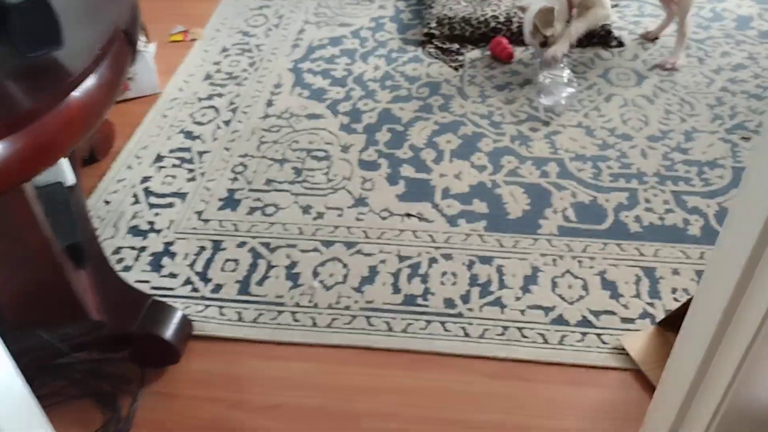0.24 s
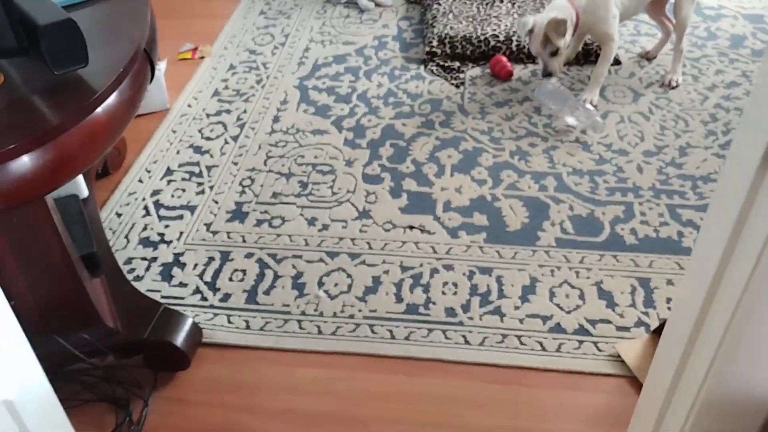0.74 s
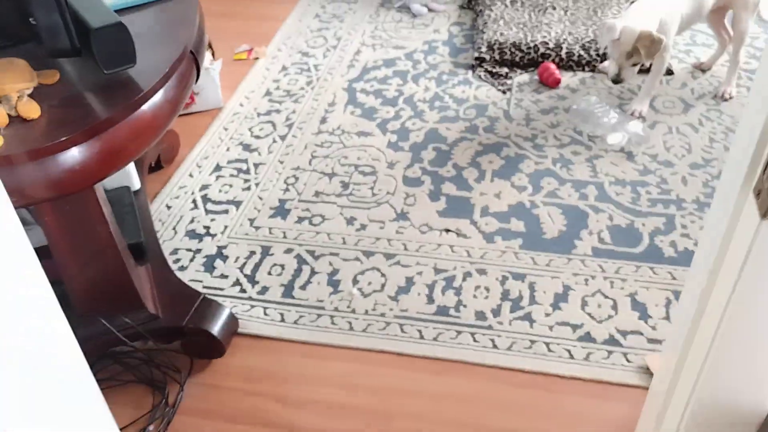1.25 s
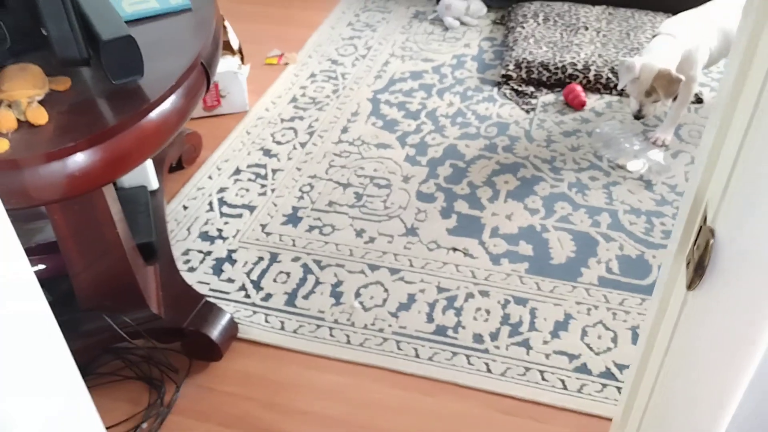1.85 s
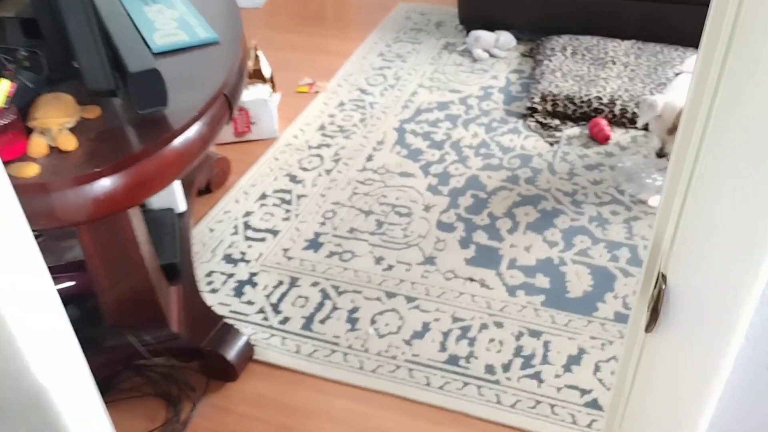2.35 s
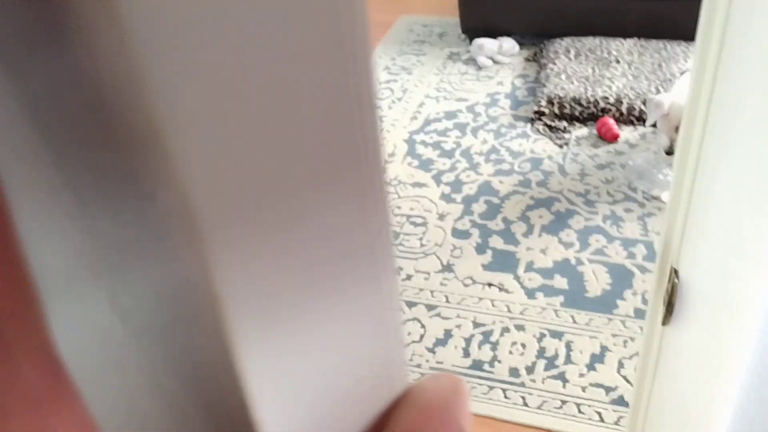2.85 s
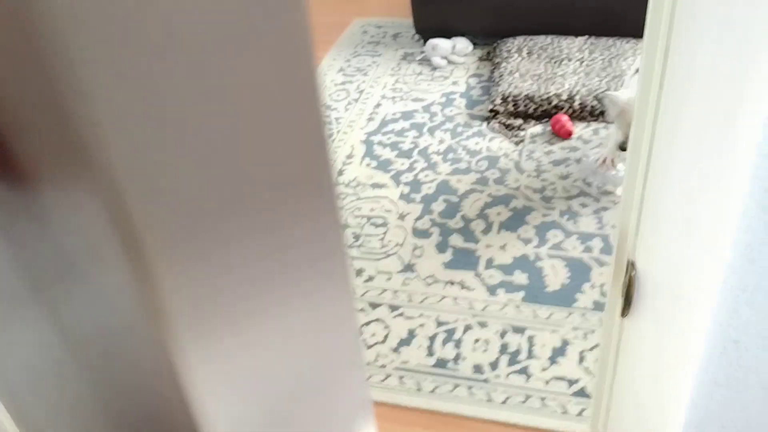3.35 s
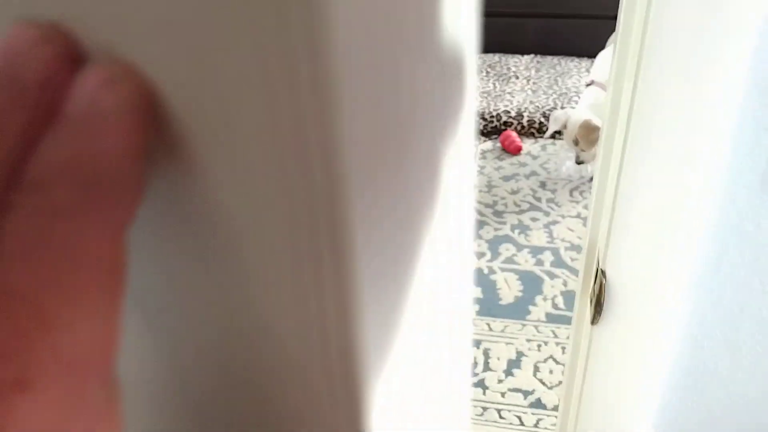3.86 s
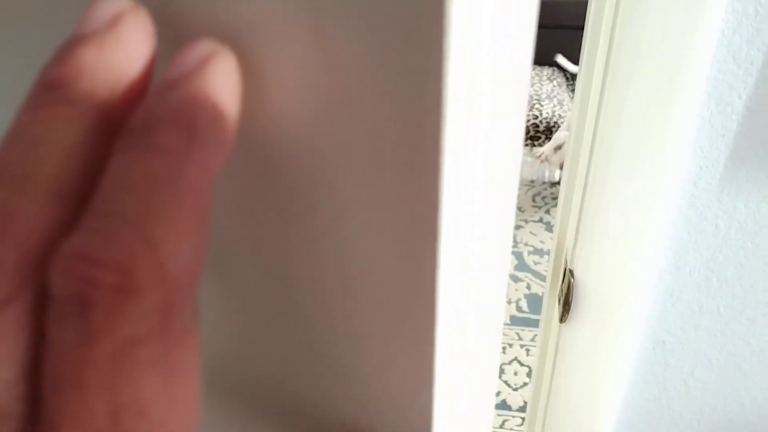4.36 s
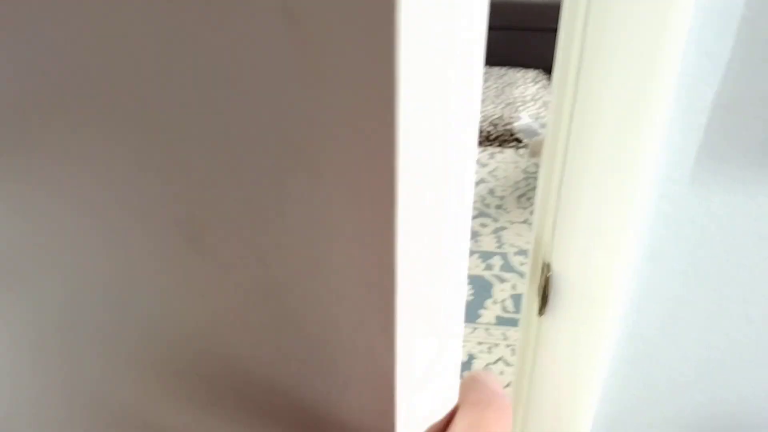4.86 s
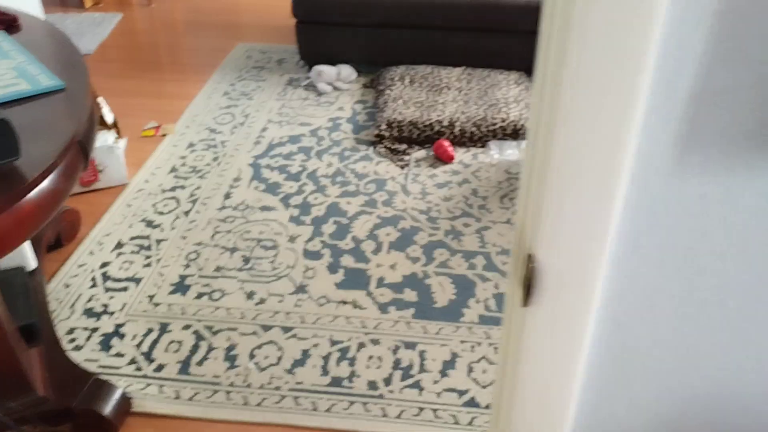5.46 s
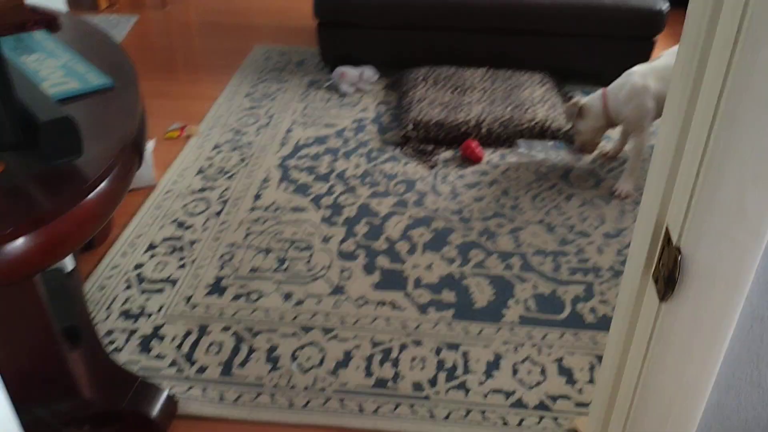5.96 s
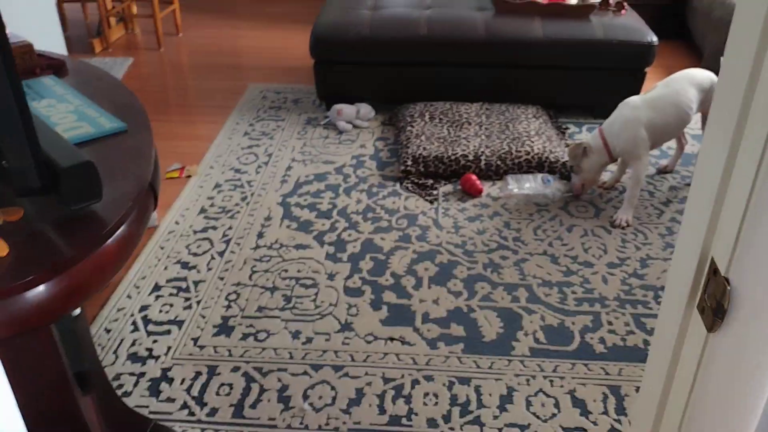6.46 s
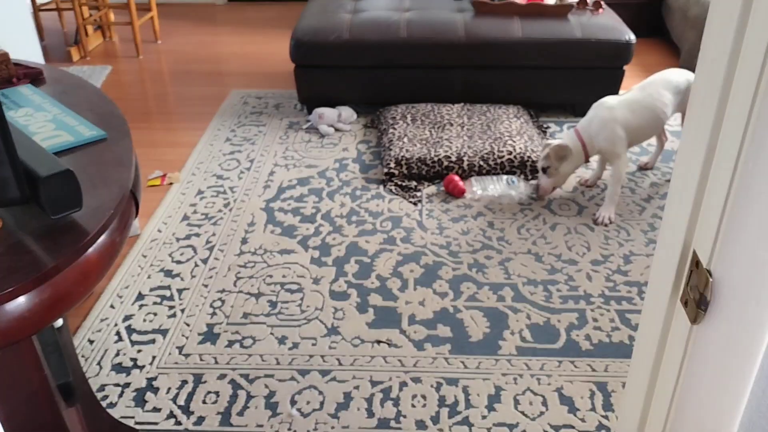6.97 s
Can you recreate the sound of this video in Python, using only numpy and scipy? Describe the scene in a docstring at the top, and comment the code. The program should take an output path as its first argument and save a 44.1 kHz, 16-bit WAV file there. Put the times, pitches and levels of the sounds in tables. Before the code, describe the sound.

A quiet living room, picked up in stereo from the doorway, with very faint room tone. A puppy mouths an empty plastic bottle on a rug. From 0.3 s sharp dry snaps begin; between 0.43 and 0.9 s they become the loudest cluster, bright cracks with hollow low-mid pops, rattle and a floor thump near 0.9. Crinkling continues, with smaller cracks at 1.2 and 1.4 s. From 1.5 to 3.2 s it is mostly quiet: soft sliding hiss around 2 s, thin airy squeaks, faint dull taps on the door and a barely audible low hum. A bright double snap comes at 3.25 s, then light crumpling from 3.5 to 4 s. Bouts of crackle and hollow knocks follow at 4.6-4.95 and 5.15-5.6 s. After a lull with a dull close tap at 5.9, crunching returns at 6.2-6.9 s, ending with a faint rustle near 7.1. Short diffuse reverberation follows each crack.

```python
"""A living room with a rug, heard from the doorway: a puppy bites and shoves an empty plastic bottle.
Each bite is a noise burst that snaps and a set of ringing modes that boom and rattle.
Small random ticks crinkle the wall between bites; shaped noise hisses as the bottle slides on the pile.
A diffuse tail rings on after every blow. Thumps, door hum, taps, whistles and room tone lie around it.
Two microphone ports with their own colour pick it up."""
import sys
import numpy as np
from scipy import signal
from scipy.fft import rfft, irfft
from scipy.io import wavfile
from scipy.ndimage import uniform_filter1d

SR = 44100
rng = np.random.default_rng(int(sys.argv[2]) if len(sys.argv) > 2 else 0)


def store_wav(level_fs):
    """Save 16-bit WAV to argv[1]."""
    pcm = np.round(np.clip(np.atleast_2d(level_fs), -1, 1) * 32767)
    wavfile.write(sys.argv[1], SR, pcm.T.astype(np.int16))


N = 318843

# Spectrum of the quiet room: f/Hz, relative level/dB
ROOM_TONE_COLOUR = [(15, -58.5), (25, -16.5), (91, -1), (168, -15.5), (271, -18.5), (2780, -33),
                    (6160, -32.5), (7820, -26), (10200, -35.5), (11000, -20), (14000, -37.5)]
# A thin steady whine: f/Hz, width/Hz, level/dB
WHINE_BANDS = [(11060, 32, -69.5)]
# Low thumps through the floor: t/s, level/dB
FLOOR_THUMPS = [(.26, -66), (.41, -51), (.675, -35), (.79, -55), (0.882, -21), (1.0, -35), (1.15, -52),
                (1.42, -69.5), (2.17, -69), (3.26, -47.5), (3.44, -42), (3.6, -44.5), (4.03, -56),
                (4.19, -60.5), (4.68, -53.5), (4.76, -44.5), (5.18, -60), (5.32, -46.5), (5.43, -53),
                (6.43, -61)]
# Low hum of the moving door: start t/s, end t/s, level at start/dB, level at end/dB
DOOR_MOVE = (2.5, 3.5, -70.5, -67)
# Fingers on the door: t/s, level/dB, f/Hz
DOOR_TAPS = [(1.88, -54, 460), (2.186, -56.5, 150), (2.655, -58.5, 201), (3.033, -49.5, 469.4),
             (3.064, -53.5, 109.7), (5.93, -44.5, 317)]
# Decay of the room by 60 dB: f/Hz, t60/s
ROOM_DECAY = [(100, 0.067), (300, 0.49), (1000, 0.35), (4000, 0.43), (12000, 0.16)]
# Likeness of left and right noise, 1 the same, 0 unrelated, -1 opposed: f/Hz, likeness
STEREO_LIKENESS = [(60, -0.7), (180, 0.85), (550, 0.72), (1650, -0.12), (4970, -0.27), (15000, -0.34)]
# Colour difference of the two ports: f/Hz, left over right/dB
PORT_COLOUR = [(60, 2), (160, -1), (270, 2.5), (450, 3.5), (740, 5), (1220, 7), (2010, 8.5), (3330, 13.5),
               (5500, 9), (7000, 15.5), (8800, 19.5), (9800, 2), (11200, -5.5), (14000, 2.5)]
# Narrow whistles inside the hiss; a row that ends before it starts is silent:
# start t/s, end t/s, f/Hz, width/Hz, level/dB
WHISTLE_BANDS = [(1.5, 2.34, 4700, 82, -61), (1.93, 2.336, 5700, 270, -53), (1.6, 2.39, 2490, 100, -65.5),
                 (2.52, 2.72, 7700, 310, -67), (3.03, 3.4, 3200, 260, -56), (3.3, 3.24, 1950, 130, -77),
                 (4, 3.24, 650, 68, -63.5), (1.73, 2.5, 614, 57, -77.5), (4.2, 3, 800, 100, -54),
                 (1.93, 2.3, 3870, 180, -59)]
# Spectrum of crackle and rubbing: f/Hz, relative level per Hz/dB
HISS_COLOUR = [(880, -14), (1500, -6), (2480, -7.5), (3050, -6.5), (4480, -12), (5550, -5.5), (6450, -11.5),
               (8370, -7), (10100, -8.5), (11500, -5.5), (14000, -12.5)]
# Strokes of fine crackle and sliding: start t/s, end t/s, level at start/dB, level at end/dB,
# tilt/dB (cut below and lift above 5.5 kHz), top lift/dB (above about 10 kHz), left over right/dB
SLIDE_STROKES = [(0, .03, -58, -58, 6.5, 1, 0), (.095, .2, -50.5, -59.5, 4, 5, 1),
                 (.32, .4, -52.5, -34, 4.5, -4.5, -7), (.45, .8, -38.5, -35.5, 2, -5, -4),
                 (.83, 1.0, -32, -36, -6.5, 11.5, -2.5), (1.03, 1.3, -34, -51, -0.5, 3, -1.5),
                 (1.35, 1.68, -51.5, -56.5, 3.5, 7.5, -8), (1.875, 2.225, -51, -46.5, 7.5, -1.5, -8),
                 (2.33, 2.42, -71, -71, 6, 7, -11.5), (2.58, 2.645, -72.5, -79.5, 4, -2, -3.5),
                 (2.822, 2.882, -65, -68, 3.5, .5, -5.5), (3.065, 3.235, -55.5, -47.5, 7, -2.5, -5.5),
                 (3.4, 3.56, -61, -43, 1, -1, 2.5), (3.6, 4.02, -43, -49.5, -1, 1.5, 3),
                 (4.05, 4.22, -47.5, -67, -1, 1, 6), (4.26, 4.56, -65, -78, -2, -3, 9),
                 (4.66, 4.82, -35.5, -45, -1, -2.5, 4), (4.85, 5.08, -38, -49, -0.5, -1.5, 4),
                 (5.1, 5.16, -63, -53, 1, -4, 2), (5.3, 5.62, -46.5, -43.5, -2, -3, 0),
                 (5.66, 5.79, -57.5, -60, -0.5, 5, -2), (5.82, 6.0, -71, -65, 4.5, 0, -1.5),
                 (6.05, 6.2, -57.5, -62.5, 3.5, 7, 0), (6.24, 6.42, -55.5, -57, 0, 4, 0),
                 (6.53, 6.93, -45.5, -50, 2.5, -1.5, -1.5), (6.96, 7.12, -53.5, -60, 0, 9, 2.5)]
# Low modes of the bottle's shell and air: f/Hz, level/dB, t60/s
BOOM_MODES = [(112, -18, 0.059), (168, -14.5, 0.13), (172, -11.5, 0.15), (231.8, -5.5, 0.13),
              (293.7, -3.5, 0.098), (320, -2, 0.1), (370, -3, 0.036), (412.2, -6, 0.094), (525.4, 3, 0.054),
              (616, -0.5, 0.078)]
# Higher modes of the bottle: f/Hz, level/dB, t60/s
RATTLE_MODES = [(773, -2.5, 0.014), (835.6, -4.5, 0.023), (1030, -1, 0.013), (1294, -0.5, 0.0053),
                (1583, -14.5, 0.03), (1900, -6, 0.01), (2200, -10.5, 0.0039)]
# Bouts of chewing that keep the wall creasing: start t/s, end t/s, boom level at start/dB,
# boom level at end/dB, boom centre f/Hz, rattle over boom/dB
CHEW_BOUTS = [(.08, .14, -69, -75, 610, -2.5), (.48, .63, -54, -46, 375, 4.5),
              (.66, .79, -48.5, -46.5, 370, 0), (.89, 1.1, -39.5, -44.5, 388, 3),
              (1.13, 1.2, -38.5, -43, 310.5, -7.5), (1.25, 1.5, -39, -47, 365, -5),
              (2.03, 2.27, -78, -83.5, 594, -8.5), (3.4, 3.47, -69, -69, 400, -0.5),
              (3.53, 3.7, -53.5, -56, 500, -3), (3.74, 3.93, -63.5, -59, 505, 6.5),
              (4.0, 4.1, -54, -64, 285, 4), (4.2, 4.36, -70.5, -79, 400, 8.5),
              (4.74, 4.83, -57, -47, 331, 6), (4.86, 5.02, -46.5, -53, 499, 7.5),
              (5.25, 5.4, -46.5, -36, 384, -5.5), (5.44, 5.57, -51.5, -45, 329, 1.5),
              (5.62, 5.72, -58, -66, 310, 3), (6.22, 6.33, -61, -61, 280, 0.5),
              (6.39, 6.5, -56.5, -61.5, 287.2, 2.5), (6.55, 6.86, -50.5, -57, 269.2, -0.5),
              (7.09, 7.23, -59.5, -62.5, 243.5, 2)]
# Wall buckling under a bite: t/s, crack level/dB, crack f/Hz, boom level/dB, boom centre f/Hz,
# rattle level/dB, crack left over right/dB, crack sharpness/dB
BITES = [(0.3097, -20.5, 7500, -53, 558, -43, 2, -3.5), (0.3644, -16.5, 3400, -37, 574, -31, 12, -2),
         (0.386, -19, 2450, -41, 543, -33.5, 9, -12), (0.4117, -24, 2000, -32, 480, -26, 7.0, 1.5),
         (0.4357, -10, 3240, -32.5, 294, -20, 16, -5), (0.5998, -15.5, 2940, -14, 175, -23.5, 14, -6.5),
         (0.6221, -21.5, 2880, -13.5, 380, -47, -6, -13.5), (0.6494, -10.5, 2800, -13, 377, -13.5, 4, -4),
         (0.6657, -11.5, 11500, -32, 277, -24, 12, -11), (0.682, -38, 8550, -35, 315, -46, 0, -11.5),
         (0.7213, -47, 8300, -53, 326, -42, -2, -13), (0.7933, -23.5, 3220, -22, 544, -21, 16, -12),
         (0.8263, -11.5, 7600, -30.5, 287.5, -47, 17.5, 2.5), (0.8415, -38, 7310, -16, 506, -16, 0, -10),
         (0.8615, -10, 9560, -25, 291, -21.5, -6, -2.5), (0.8839, -28, 8690, -23, 274.5, -20.5, 7, -9.5),
         (0.9617, -36, 3100, -24, 476, -24.5, -5, 3), (1.2172, -36, 3170, -27, 350, -27.5, 25, -8),
         (1.4196, -29.5, 3100, -29, 320.6, -29.5, 3.5, -11.5),
         (3.2418, -24.5, 3868, -31, 699, -33.5, 18.5, 0),
         (3.2469, -10.5, 2950, -24.5, 172, -24.5, -10, -3.5), (3.4279, -67, 3060, -33, 240, -41, 1, -13),
         (3.5469, -33, 8660, -29.5, 616, -37, -1, -9), (3.5752, -34, 8530, -32, 310, -29, 18, -9),
         (3.641, -42, 2370, -31.5, 626, -31, 6, -18), (3.6744, -50, 3590, -38, 659, -35.5, 4, -17),
         (3.703, -32, 3150, -40.5, 544, -46, 8, -14), (3.8704, -46, 10900, -38, 590, -39.5, 8.5, -9),
         (3.9974, -23.5, 3900, -25, 245, -34, 8, -6.5), (4.5887, -24, 3760, -36, 264, -33, 5.5, -13.5),
         (4.6563, -36, 5260, -27, 248, -33, 3, 4), (4.7237, -27.5, 3200, -22, 204, -27.5, 5, -9),
         (4.7479, -32, 2240, -25.5, 483, -33.5, 13, -18), (4.78, -33, 2870, -27.5, 242, -28, 18, -18),
         (4.8533, -21, 2040, -25, 627, -26.5, -1, -17), (4.8943, -27.5, 2040, -27.5, 616, -20, 22, -9),
         (4.9208, -18, 1980, -24.5, 580, -28, 6, -6), (5.1653, -27.5, 7210, -22.5, 550, -26.5, 10, -27),
         (5.1761, -24, 3240, -18.5, 288, -27, 9, -13.5), (5.1916, -23, 3260, -29, 530, -20, 0, 5),
         (5.2901, -27.5, 2950, -24.5, 550, -24, 8, -8), (5.4309, -31.5, 3170, -31, 624, -27.5, 13, -14.5),
         (5.5022, -35, 2910, -33, 312, -30.5, 1, -11), (6.2073, -50.5, 11300, -49.5, 412, -42.5, 3, -19),
         (6.239, -40, 3430, -38, 250, -36, -2.5, -10), (6.2591, -46, 2610, -36, 308, -37, 12, -12),
         (6.3745, -30, 2650, -29, 320, -34, -15, -13), (6.3783, -24, 4300, -21.5, 248, -23.5, 14.5, -3),
         (6.3932, -48, 2740, -28.5, 308, -52, 1, -9), (6.4246, -27, 2080, -31, 229, -23, 17, -10),
         (6.4921, -22.5, 3100, -25.5, 232, -22, 12, -9.5), (6.5515, -32.5, 2040, -31.5, 620, -33, 26, -14),
         (6.6271, -26.5, 3230, -38.5, 506, -54, 5, 4), (6.6523, -27.5, 3960, -61, 229, -35, 5, -5),
         (6.705, -35.5, 2200, -31, 235, -35.5, 6, -20), (7.074, -43, 2000, -41.5, 295, -46.5, -5, -14)]

ROOM_TONE_DB, RUMBLE_REST_DB = -76, -87.5 + .5
THUMP_RISE_DB_PER_S, THUMP_FALL_DB_PER_S = 400.5, 251.5
DOOR_HZ, DOOR_WIDTH_HZ, DOOR_FADE_DB_PER_S = 86.5, 14, 103
ROOM_DB, CRACK_ROOM_DB = 5, 6.5   # drive into the room: body, cracks
STROKE_RISE_DB_PER_S, STROKE_FALL_DB_PER_S, STROKE_REST_DB = 296.5, 243, -80
# small flat facets of the wall ping inside the crackle
FACET_LOW_HZ, FACET_HIGH_HZ, FACET_T60_S, FACET_TICKS_PER_S, FACET_DB = 1787, 11890, .025, 44, -8
CHEW_RISE_DB_PER_S, CHEW_FALL_DB_PER_S, CHEW_REST_DB = 303, 251, -87.5
BUCKLE_S = 0.003004   # longest run of a fold along the wall, so modes start at different moments
STEADY_TOP_HZ, CUTOFF_HZ = 14250, 16100   # top of the main mix, top of the pickup


def from_db(db):
    """dB to amplitude gain."""
    return 10 ** (np.asarray(db) / 20)


def rms_one(x):
    """Scale to an overall rms of 1."""
    return x / np.sqrt(np.mean(x ** 2) + 1e-20)


def at_hz(points, hz):
    """Read an (f/Hz, value) table on a log frequency axis."""
    p = np.array(points, float)
    return np.interp(np.log(np.maximum(hz, 1)), np.log(np.maximum(p[:, 0], 1)), p[:, 1])


def coloured(x, gain_db):
    """Shape the spectrum by a gain in dB on the FFT grid."""
    return irfft(rfft(x) * from_db(gain_db), N)


def butter(x, order, hz, kind="low"):
    """Butterworth filter."""
    return signal.sosfilt(signal.butter(order, hz, kind, fs=SR, output="sos"), x)


def butter_zero_phase(x, order, hz, kind="low"):
    """Butterworth filter run both ways, so bands can be subtracted."""
    return signal.sosfiltfilt(signal.butter(order, hz, kind, fs=SR, output="sos"), x)


def steep(x, top_hz):
    """Steep low-pass."""
    return signal.sosfilt(signal.ellip(12, .5, 75, top_hz, fs=SR, output="sos"), x)


def ring(clicks, hz, t60):
    """Two-pole resonance: a unit click starts a decaying sine of height 1."""
    radius, angle = from_db(-60 / (t60 * SR)), 2 * np.pi * hz / SR
    # the tiny offset keeps the filter from slowing down in silence
    return signal.lfilter([0, np.sin(angle)], [1, -2 * radius * np.cos(angle), radius ** 2], clicks + 1e-18)


def narrow_noise(noise, hz, width_hz):
    """Noise through one resonance of the given bandwidth, rms 1."""
    return rms_one(ring(noise, hz, np.log(1000) / np.pi / width_hz))


def pair(count):
    """Spectra of left and right noise whose likeness follows the table band by band."""
    mid, side = rfft(rng.standard_normal((2, count)))
    alike = np.clip(at_hz(STEREO_LIKENESS, np.fft.rfftfreq(count, 1 / SR)), -1, 1)
    return (np.sqrt(1 + alike) * mid + np.sqrt(1 - alike) * side * [[1], [-1]]) / np.sqrt(2)


def left_right(pan_db):
    """Gains of the two sides, half the difference each way."""
    return from_db(np.array([[.5], [-.5]]) * pan_db)


def gestures(rows, rise_db_per_s, fall_db_per_s, rest_db):
    """Each row rises, drifts between two levels and falls; powers add, other columns lean to the loudest."""
    start, end, first_db, last_db, *columns = np.array(rows, float).T[:, :, None]
    t = np.arange(0, N + 64, 64) / SR
    progress = np.clip((t - start) / np.maximum(end - start, 1e-6), 0, 1)
    db = first_db + (last_db - first_db) * progress
    db = db - rise_db_per_s * np.maximum(start - t, 0) - fall_db_per_s * np.maximum(t - end, 0)
    power = from_db(2 * np.maximum(db, -1000))
    total = power.sum(axis=0)
    curves = [10 * np.log10(total + from_db(2 * rest_db))]
    curves += [(power * column).sum(axis=0) / total for column in columns]
    return [np.interp(np.arange(N) / SR, t, curve) for curve in curves]


def grains(per_s, spread_db):
    """Random ticks of the creasing wall, a few much larger than the rest."""
    out, ticks = np.zeros(N), int(per_s * N / SR)
    where, size, sign = rng.random((ticks, 3)).T
    height = from_db(spread_db * np.minimum(-np.log(size), 4))
    out[(where * N).astype(int)] = height * np.sign(sign - .5)
    return out


def room_tone():
    """Quiet room: steady stereo noise with its own spectrum."""
    noise = irfft(pair(N), N)
    return from_db(ROOM_TONE_DB) * rms_one(coloured(noise, at_hz(ROOM_TONE_COLOUR, np.fft.rfftfreq(N, 1 / SR))))


def whine():
    """Thin steady whine: noise in a very narrow resonance."""
    out = np.zeros((2, N))
    for hz, width_hz, level_db in WHINE_BANDS:
        out += from_db(level_db) * narrow_noise(rng.standard_normal((2, N)), hz, width_hz)
    return out


def floor_thumps():
    """Blows through the floor: low band noise that swells and dies quickly."""
    rows = [(s, s, db, db) for s, db in FLOOR_THUMPS]
    level_db, = gestures(rows, THUMP_RISE_DB_PER_S, THUMP_FALL_DB_PER_S, RUMBLE_REST_DB)
    low = butter(rng.standard_normal(N), 3, [82, 145], "band")
    return from_db(level_db) * rms_one(low)


def door_hum():
    """Moving door: noise in one low resonance, faded in and out."""
    level_db, = gestures([DOOR_MOVE], DOOR_FADE_DB_PER_S, DOOR_FADE_DB_PER_S, RUMBLE_REST_DB)
    return from_db(level_db) * narrow_noise(rng.standard_normal(N), DOOR_HZ, DOOR_WIDTH_HZ)


def door_taps(t60=0.014, puff_db=-1.5):
    """Short dull knocks close to the microphone: a damped ring and a puff of noise."""
    out, size = np.zeros(N), 2048
    decay = from_db(-60 * np.arange(size) / SR / t60)
    for (s, level_db, hz), noise in zip(DOOR_TAPS, rng.standard_normal((len(DOOR_TAPS), size))):
        puff = butter(noise, 2, 1800) * decay
        knock = ring(np.arange(size) == 0, hz, 7.8 / hz) + from_db(puff_db) * puff
        i = round(s * SR)
        out[i:i + size] += from_db(level_db) * knock
    return out


def room(x, first_s=0.0034):
    """Diffuse tail: stereo noise dying band by band, starting after the first wall path."""
    size = SR
    t, noise, tail = np.arange(size) / SR, pair(size), 0
    octave = np.log2(np.maximum(np.fft.rfftfreq(size, 1 / SR), 1))
    for centre in range(5, 15):   # overlapping octave bands
        band = irfft(noise * np.clip(1 - np.abs(octave - centre), 0, 1), size)
        tail = tail + band * from_db(-60 * t / at_hz(ROOM_DECAY, 2 ** centre))
    tail = tail * np.clip(t / first_s - 1, 0, 1)
    # the room favours no pitch region: even out its broad colour
    spectrum = rfft(tail)
    tail = irfft(spectrum / np.sqrt(uniform_filter1d(np.abs(spectrum) ** 2, size=20)), size)
    tail = tail * np.clip(8 - 10 * t / .5, 0, 1) ** 2   # silent after 0.4 s
    tail = tail / np.sqrt(np.sum(tail ** 2) / 2)        # mean energy 1 per side
    return signal.fftconvolve(x[None], tail, axes=1)[:, :N]


def whistles():
    """Noise in a narrow resonance, swelling and fading."""
    out, t = np.zeros((2, N)), np.arange(N) / SR
    for start, end, hz, width_hz, level_db in WHISTLE_BANDS:
        on = slice(round(start * SR), round(end * SR))
        band = narrow_noise(rng.standard_normal((2, N))[:, on], hz, width_hz)
        swell = np.sin(np.pi * (t[on] - start) / (end - start))
        out[:, on] += from_db(level_db) * band * swell
    return out


def facet_pings():
    """Flat facets of the wall ping at random, alternate pitches left and right."""
    pitches = np.geomspace(FACET_LOW_HZ, FACET_HIGH_HZ, num=24)
    pings = [ring(grains(FACET_TICKS_PER_S, 3.7), hz, FACET_T60_S) for hz in pitches]
    return from_db(FACET_DB) * rms_one(np.array([sum(pings[::2]), sum(pings[1::2])]))


def hiss():
    """Dense fine crackle and rubbing on the pile, its colour and side shifting with the stroke."""
    level_db, tilt_db, lift_db, pan_db = gestures(
        SLIDE_STROKES, STROKE_RISE_DB_PER_S, STROKE_FALL_DB_PER_S, STROKE_REST_DB)
    rubbing = irfft(pair(N), N)
    crackle = .5 * rms_one(grains(500, 1.5))
    spectrum_db = at_hz(HISS_COLOUR, np.fft.rfftfreq(N, 1 / SR))
    fine = rms_one(coloured(rubbing + crackle + facet_pings(), spectrum_db))
    dull = butter_zero_phase(fine, 2, 5500)
    top = butter_zero_phase(fine, 4, 9900, "high")
    bright = fine - dull - top + top * from_db(lift_db)
    return from_db(level_db) * left_right(pan_db) * (dull * from_db(-tilt_db) + from_db(tilt_db) * bright)


def shell(modes, blow_db, work_db, per_s, blow_hz=None, work_hz=None, db_per_octave=9.5):
    """Bites and small creases ring the same modes; where the jaw grips decides which modes lead."""
    at = np.round(np.array(BITES)[:, 0] * SR).astype(int)
    grip_db = rng.normal(0, 2.55, (len(at), len(modes)))
    late = (rng.random((len(at), len(modes))) * BUCKLE_S * SR).astype(int)
    blows, creases = np.zeros(N), np.zeros(N)

    def off_centre_db(hz, centre_hz):
        """Modes weaken with their distance from the centre pitch."""
        return 0 if centre_hz is None else db_per_octave * np.abs(np.log2(hz / centre_hz))

    for k, (hz, mode_db, t60) in enumerate(modes):
        clicks = np.zeros(N)
        click_db = blow_db + mode_db - off_centre_db(hz, blow_hz) + grip_db[:, k]
        clicks[at + late[:, k]] = from_db(click_db) * (-1) ** k   # neighbouring modes start opposed
        blows += ring(clicks, hz, t60)
        creases += from_db(mode_db - off_centre_db(hz, work_hz)) * ring(grains(per_s, 3.5), hz, t60)
    return blows + from_db(work_db) * rms_one(creases)


def bottle_body():
    """Boom and rattle of the hollow bottle under bites and chewing."""
    chew_db, boom_hz, rattle_db = gestures(CHEW_BOUTS, CHEW_RISE_DB_PER_S, CHEW_FALL_DB_PER_S, CHEW_REST_DB)
    bites = np.array(BITES)
    boom = shell(BOOM_MODES, bites[:, 3], chew_db, 60., bites[:, 4], boom_hz)
    rattle = shell(RATTLE_MODES, bites[:, 5], chew_db + rattle_db, 150.)
    return butter(boom + rattle, 4, 125, "high")   # too small to radiate deep bass


def cracks(t60=0.029, width=0.81):
    """Each buckle is a short stereo noise burst, and a click of equal energy that wakes the room."""
    direct, click, size = np.zeros((2, N)), np.zeros(N), 1024
    decay = from_db(-60 * np.arange(size) / SR / t60)
    bursts = rng.standard_normal((len(BITES), size)) * decay
    for burst, (s, level_db, hz, *_, pan_db, sharp_db) in zip(bursts, BITES):
        both = np.array([burst, np.arange(size) == 0])
        colour = signal.lfilter(*signal.iirpeak(hz, 1 / width, SR), both)   # width is relative to hz
        tone, edge = colour + from_db(sharp_db) * np.diff(both, prepend=0)
        tone = tone / np.abs(tone).max()
        i = round(s * SR)
        direct[:, i:i + size] += from_db(level_db) * left_right(pan_db) * tone
        click[i:i + size] += from_db(level_db) * edge * np.sqrt(np.sum(tone ** 2) / np.sum(edge ** 2))
    return direct, click


def scene():
    """Background, room and bottle summed at the two ports."""
    background = room_tone() + whine() + floor_thumps() + door_hum() + door_taps()
    body = bottle_body()
    crack, click = cracks()
    tail = room(from_db(ROOM_DB) * body + from_db(CRACK_ROOM_DB) * click)
    steady = steep(background + tail + whistles() + hiss() + body + crack, STEADY_TOP_HZ)
    # a trace of the cracks reaches the very top
    return steady + from_db(-27.5) * (crack - steep(crack, STEADY_TOP_HZ))


def record(dry):
    """Each port has its own colour; peaks are rounded and the top is cut."""
    lean_db = at_hz(PORT_COLOUR, np.fft.rfftfreq(N, 1 / SR))
    return steep(np.tanh(coloured(dry, lean_db * [[.5], [-.5]])), CUTOFF_HZ)


dry = scene()
out = record(dry)
store_wav(out)
```